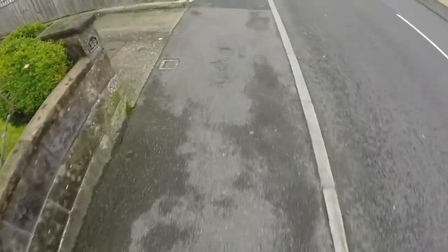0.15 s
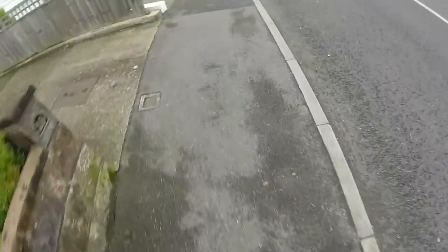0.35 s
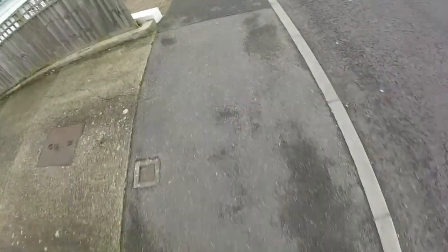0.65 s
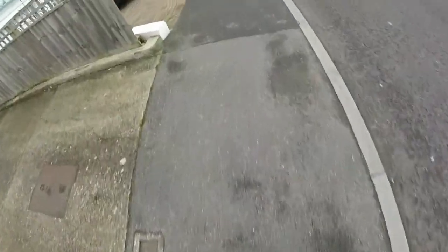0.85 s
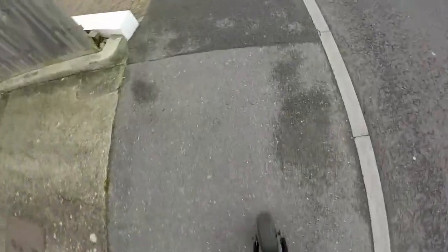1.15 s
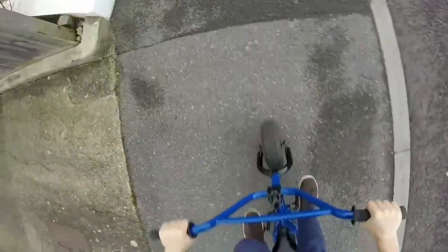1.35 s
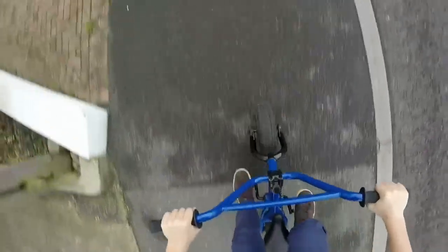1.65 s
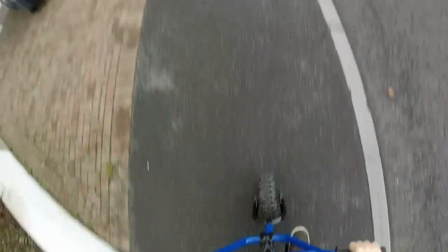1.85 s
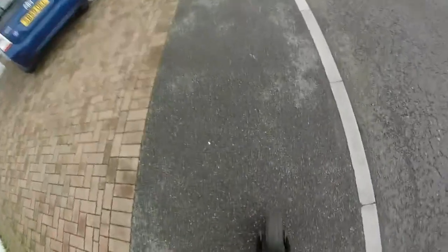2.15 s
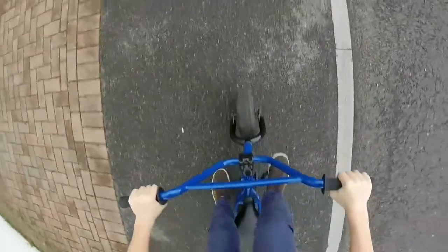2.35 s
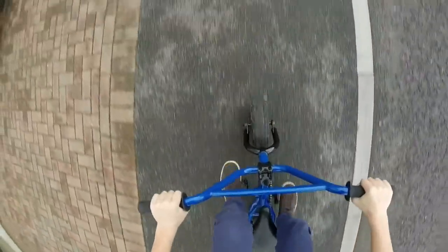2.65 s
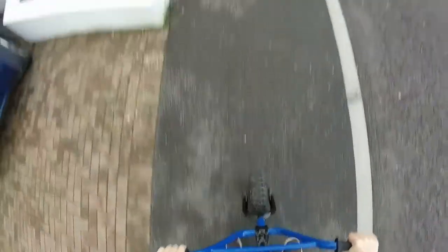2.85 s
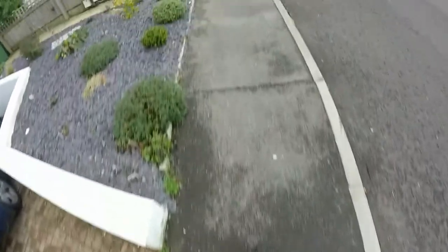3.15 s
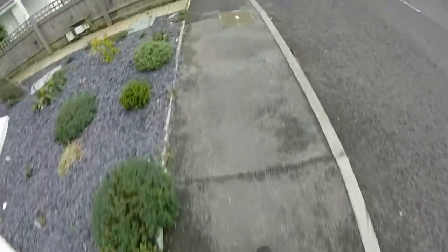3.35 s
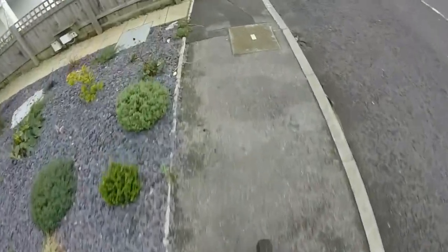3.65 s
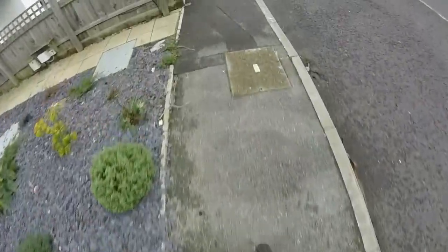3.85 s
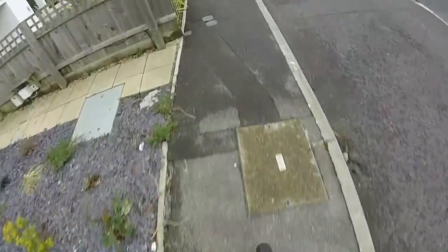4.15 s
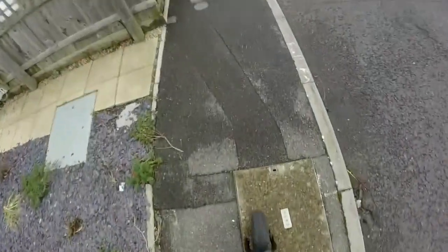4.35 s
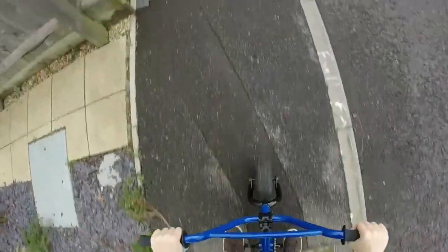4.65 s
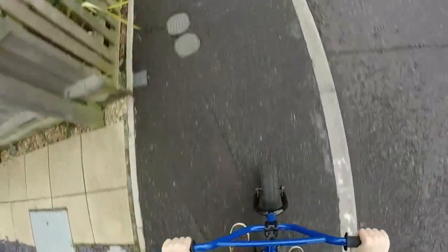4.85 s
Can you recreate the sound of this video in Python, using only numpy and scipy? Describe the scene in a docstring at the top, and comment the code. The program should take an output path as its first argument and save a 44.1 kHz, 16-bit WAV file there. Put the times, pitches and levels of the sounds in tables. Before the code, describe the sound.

Wind rumbles and bike tyres hiss over grit until bumps shake a loose camera mount into loud, hollow, quacking knocks.

```python
"""A plastic camera mount clacks on the rider of a small bike rolling along an asphalt pavement.
Near the end, bumps around a drain cover shake it into a quick run of quack-like knocks: it strikes its
stop, taps, and drops back hollowly, ringing the case. Underneath, heard from the worn camera, wind
rumbles on the case, the tyres hiss and crackle over grit, and the strap rubs in short rasps.
Shortly before the run of clacks a wheel starts to swish and whirr once a turn."""
import sys
import numpy as np
from scipy import signal
from scipy.fft import rfft, irfft
from scipy.io import wavfile
from scipy.ndimage import uniform_filter1d, minimum_filter1d

SR = 44100
rng = np.random.default_rng(int(sys.argv[2]) if len(sys.argv) > 2 else 0)


def pcm_store(signal):
    """Save signal as 16-bit PCM."""
    levels = np.round(np.clip(np.atleast_2d(signal), -1, 1) * 32767)
    wavfile.write(sys.argv[1], SR, levels.astype(np.int16).T)


N = 220588
T = np.arange(N) / SR


def gain_of(db):
    """Decibels to amplitude."""
    return 10 ** (np.asarray(db) / 20)


def unit_rms(x):
    """Scales to rms 1."""
    return x / np.sqrt(np.mean(x ** 2) + 1e-20)


def burst(x, db):
    """Scales a short sound so that its energy, spread over 10 ms, has this level."""
    return gain_of(db) * x / np.sqrt(np.sum(x ** 2) / (SR / 100) + 1e-20)


def add(mix, s, sound):
    """Mixes a sound in at time s."""
    part = mix[max(round(s * SR), 0):][:len(sound)]
    part += sound[:len(part)]


def swells(rows):
    """An envelope with one bell for each row of t/s, level/dB, half length/s."""
    return sum(gain_of(db) * np.exp(-.75 * ((T - s) / half_s) ** 2) for s, db, half_s in rows)


def stretch(start_s, end_s, edge_s):
    """An envelope that fades in, holds and fades out."""
    return (np.tanh((T - start_s) / edge_s) - np.tanh((T - end_s) / edge_s)) / 2


def coloured(x, tone):
    """Shapes x with an EQ curve of f/Hz, level/dB; the result has rms 1."""
    f, db = np.transpose(tone)
    hz = np.fft.rfftfreq(len(x), 1 / SR)
    eq = gain_of(np.interp(np.log(hz + 1), np.log(f + 1), db))
    return unit_rms(irfft(rfft(x) * eq, len(x)))


def wander(rate_hz):
    """Smooth random modulation, rms 1."""
    hz = np.fft.rfftfreq(N, 1 / SR)
    return unit_rms(irfft(rfft(rng.standard_normal(N)) * np.exp(-(hz / rate_hz) ** 2), N))


def noise_band(hz, width_hz):
    """Noise gathered round a centre that may move, rms 1."""
    carrier = np.exp(2j * np.pi * np.cumsum(hz * np.ones(N)) / SR)
    return unit_rms((carrier * (wander(width_hz) + 1j * wander(width_hz))).real)


def grains(per_s, spread_db):
    """Random clicks; with spread, a few stand out above the rest."""
    size = gain_of(spread_db * np.minimum(rng.exponential(1, N), 4))
    return size * rng.choice([-1, 1], N) * (rng.random(N) < per_s / SR)


def rumble(tone):
    """Low noise with its own surges levelled out, ready for an envelope."""
    noise = coloured(rng.standard_normal(N), tone)
    strength = np.sqrt(uniform_filter1d(abs(signal.hilbert(noise)) ** 2, size=4000))
    return unit_rms(noise / strength)


def wind():
    """Air buffets the case: a steady flow with gusts on top."""
    # steady airflow: t/s, level/dB
    breeze = [(0, -40), (1.2, -41), (2.1, -35), (3.3, -36), (3.8, -39), (5, -40)]
    # gusts: centre t/s, level/dB, half length/s
    gusts = [(1.04, -30.5, 0.04), (1.35, -33.5, 0.08), (1.63, -21.5, 0.032), (1.71, -32, 0.03),
             (1.8, -27.5, 0.028), (2.6, -22.5, 0.049), (4.93, -35, 0.13)]
    # EQ of the eddies: f/Hz, level/dB
    wind_tone = [(4, -15.5), (9, 9), (26, -2.5), (42, -14), (55, -41), (100, -51), (300, -52), (700, -89)]
    airflow = gain_of(np.interp(T, *np.transpose(breeze)))
    return (airflow + swells(gusts)) * rumble(wind_tone)


def frame(drone_db=-50, rise_s=0.024, fade_s=0.1):
    """The bike's frame drones and booms at each bump."""
    # bumps in the pavement: t/s, level/dB
    bumps = [(0.539, -36.5), (1.62, -37.5), (1.7, -41.5), (1.78, -41), (2.04, -39.5), (2.25, -39.5),
             (2.541, -31), (3.1, -39.5), (3.5, -42), (3.8, -51.5), (4.06, -30.5), (4.23, -32),
             (4.46, -35.5), (4.6, -29)]
    # EQ of the frame's drone: f/Hz, level/dB
    drone_tone = [(25, -3.5), (44, -0.5), (53, 5.5), (64, -12), (80, -13), (120, -30.5), (300, -37),
                  (700, -78)]
    booms = sum(gain_of(db) * np.exp(-np.maximum((s - T) / rise_s, (T - s) / fade_s)) for s, db in bumps)
    return np.hypot(gain_of(drone_db), booms) * rumble(drone_tone)


def tyres(road_db=-55.5, flutter_db=0.9, grit_db=-77, sand_db=-83):
    """A steady rolling wash, grit that crackles louder on rough stretches, and a fine fizz of sand."""
    # EQ of rubber rolling on asphalt: f/Hz, level/dB
    road_tone = [(40, -7), (100, 1.5), (170, 1.5), (300, -4.5), (600, -7.5), (1000, -10.5), (1800, -10),
                 (2700, -13), (3400, -17.5), (4500, -19.5), (6000, -23.5), (8000, -28.5), (11000, -33.5),
                 (15000, -42)]
    # gritty stretches: start t/s, end t/s, level/dB
    patches = [(.7, 1.55, -76.5), (1.56, 2.173, -65), (2.524, 3.162, -67), (3.15, 3.75, -75)]
    # EQ of the grit: f/Hz, level/dB
    grit_tone = [(500, -7), (1500, -25), (2750, 8.5), (3400, -5), (4400, 4), (6000, -7.5), (7500, -18),
                 (9000, -12.5), (11000, -35), (14000, -50)]
    # EQ of the sand: f/Hz, level/dB
    sand_tone = [(3000, -23), (6000, 1), (8800, -19), (12000, -5), (15000, -20)]
    wash_gain = gain_of(road_db + flutter_db * wander(rate_hz=37))
    wash = wash_gain * coloured(rng.standard_normal(N), road_tone)
    roughness = sum(gain_of(db) * stretch(start, end, edge_s=0.051) for start, end, db in patches)
    grit = (gain_of(grit_db) + roughness) * coloured(grains(per_s=520, spread_db=2.0), grit_tone)
    sand = gain_of(sand_db) * coloured(grains(per_s=260, spread_db=1.5), sand_tone)
    return wash + grit + sand


def stones(chink_hz=8750, chink_t60=0.012, detune=.03):
    """Flicked stones ping the metal of the wheel; the smallest only chink."""
    # modes of the rim: f/Hz, level/dB, t60/s
    rim_modes = [(2770, 2.5, 0.038), (3945, 3.5, 0.018), (4460, 3.5, 0.02), (5240, -5, 0.015),
                 (5960, -11, 0.018)]
    # stones hitting the wheel: t/s, level/dB
    hits = [(0.593, -61), (1.267, -62.5), (1.735, -57), (1.781, -52), (2.029, -54), (2.718, -65)]
    # chinks of fine grit: t/s, level/dB
    chinks = [(3.007, -78), (3.029, -73), (3.069, -79), (3.093, -73), (3.631, -71)]
    out, t = np.zeros(N), np.arange(SR // 12) / SR
    ping = sum(gain_of(db - 60 * t / t60) * np.sin(2 * np.pi * hz * t) for hz, db, t60 in rim_modes)
    for s, db in hits:
        add(out, s, burst(ping, db))
    for s, db in chinks:
        hz = chink_hz * (1 + detune * rng.uniform(-1, 1))
        add(out, s, burst(gain_of(-60 * t / chink_t60) * np.sin(2 * np.pi * hz * t), db))
    return out


def wheel_swish(start_s=3.326, end_s=4.857, start_db=-56, growth_db_per_s=5, flutter_db=2.0):
    """The wheel's dry swish sets in, grows with a flutter and dies away."""
    # EQ of the swish: f/Hz, level/dB
    swish_tone = [(100, 4), (400, -2), (1000, -12), (1500, -2.5), (2000, 2.5), (2650, -5.5), (3200, -14),
                  (5000, -28.5), (10000, -54)]
    swish = stretch(start_s, end_s, edge_s=0.069) * coloured(rng.standard_normal(N), swish_tone)
    return swish * gain_of(start_db + growth_db_per_s * (T - start_s) + flutter_db * wander(rate_hz=23))


def wheel_whirr(db=-54, first_s=3.79, turn_s=0.42, turns=3, half_s=0.089, low_hz=2490, top_hz=2660):
    """The wheel whirrs once a turn, its pitch and level rising and falling with the pressure."""
    pressure = sum(np.exp(-((T - first_s - turn * turn_s) / half_s) ** 2 / 2) for turn in range(turns))
    hz = low_hz + (top_hz - low_hz) * pressure
    return gain_of(db) * pressure * noise_band(hz, width_hz=290)


def wheel_sizzle():
    """A thin, high rolling sizzle comes and goes."""
    # spells of sizzle: centre t/s, level/dB, half length/s
    spells = [(.345, -62, 0.0069), (1.0, -78, 0.39), (4.2, -74, 0.2), (4.72, -69, .03)]
    return swells(spells) * noise_band(hz=5800, width_hz=230)


def rasps(rows, tone):
    """Friction: each rasp is a swell of tiny slips."""
    return swells(rows) * coloured(grains(per_s=2500, spread_db=0.0), tone)


def strap():
    """Dull rubs of the strap come through the case."""
    # rubs: centre t/s, level/dB, half length/s
    rubs = [(.2, -53.5, 0.0077), (0.3, -62, 0.048), (0.363, -61, 0.0096), (.72, -56.5, 0.016),
            (0.823, -54, 0.023), (.995, -52, 0.0087), (1.326, -53, 0.015), (1.569, -44, 0.023),
            (2.116, -44, 0.021), (2.224, -47, 0.02), (2.317, -49.5, 0.024), (2.49, -55.5, 0.053),
            (2.59, -43, 0.018), (2.629, -46, 0.014), (2.736, -57, 0.053), (3.26, -54, 0.019),
            (3.85, -51, 0.023)]
    # EQ of a rub: f/Hz, level/dB
    rub_tone = [(300, -12), (600, -8.5), (950, -16), (1400, 4), (1750, 7), (2300, 1), (3000, -11.5),
                (5000, -26), (10000, -43)]
    return rasps(rubs, rub_tone)


def tyre_scuffs():
    """The tyres give a few short, bright scuffs."""
    # scuffs: centre t/s, level/dB, half length/s
    scuffs = [(2.586, -56.5, .011), (2.722, -61, .007), (2.12, -68, .025), (3.05, -69, .03)]
    # EQ of a scuff: f/Hz, level/dB
    scuff_tone = [(1500, -1), (3000, -16), (5000, 8), (7000, 1), (9000, -10), (11000, -16), (14000, -29)]
    return rasps(scuffs, scuff_tone)


def bounce(db, thump_hz=165, sag_hz=80, t60=0.053, detune=0.2):
    """The camera thumps on its strap, at a different pitch each time."""
    t = np.arange(SR // 7) / SR
    pitch = 1 + detune * rng.uniform(-1.32, 1)
    thump = sum(np.sin(2 * np.pi * hz * pitch * t) for hz in (thump_hz, sag_hz))
    return burst(thump * gain_of(-60 * t / t60), db)


def bolt(db, hz=2215, t60=0.085):
    """The thin ring that the metal bolt keeps up after a hard blow."""
    t = np.arange(SR // 7) / SR
    return burst(np.sin(2 * np.pi * hz * t) * gain_of(-60 * t / t60), db)


def snap(db, rise_s=0.00073):
    """The crisp instant in which plastic skids over plastic."""
    # EQ of the skid: f/Hz, level/dB
    snap_tone = [(3000, -26), (6000, -8), (7400, 9.5), (8400, -1), (9600, 8.5), (11000, -12), (12500, -5),
                 (13700, -14), (15000, -21)]
    t = np.arange(SR // 50) / SR
    return burst(coloured(rng.standard_normal(len(t)), snap_tone) * t * np.exp(-t / rise_s), db)


def ring(force, hz, t60, rise_s=0.00017, band_ratio=1.186):
    """A force drives one mode of the case: fast attack, decaying tail, band-passed for steep flanks."""
    t = np.arange(len(force)) / SR
    mode = (1 - np.exp(-t / rise_s)) * gain_of(-60 * t / t60) * np.sin(2 * np.pi * hz * t)
    flanks = signal.butter(2, (hz / band_ratio, hz * band_ratio), "band", fs=SR, output="sos")
    return signal.sosfilt(flanks, signal.fftconvolve(force, mode)[:len(t)])


def knock(place, db, depth_db, bright_db, edge_db, semitones, chatter_s,
          chatter=0.12, rattle=0.053, rattle_s=0.0043, rattle_hz=3200, detune=0.0077):
    """A blow, its chatter and a duller after-rattle ring the case; the place decides which modes speak."""
    # modes of the plastic case: f/Hz, t60/s, level/dB at the stop, when tapped, at the seat
    case_modes = [(238.3, 0.096, -24.5, -14, -16.5), (456, 0.037, -16, -18, -6.5),
                  (528.7, 0.02, -16, -7, 1.5), (679.5, 0.039, -11, -8.5, -8), (977, 0.024, -5, -13.5, -11),
                  (1201, 0.014, -33, -7.5, -0.5), (1481, 0.0052, 2, 4, 3.5), (1684, 0.007, 3.5, -1, 2),
                  (1922, 0.0058, -4.5, -5, -2), (2227, 0.01, -6.5, 1.5, 1.5), (2495, 0.0055, 2, -2, -21),
                  (2750, 0.009, -6.5, -15, -8), (3080, 0.0062, -19, -15, -10), (3570, 0.013, -3.5, -6, 0),
                  (4640, 0.009, -5, -2, 0.5), (5400, 0.012, -13, -13, -10.5), (5970, 0.0061, -11, -14, -24),
                  (6690, 0.0062, -11.5, -30, -22)]
    # crossovers between the deep, middle, bright and edge modes: f/Hz
    crossovers = [1000, 1300, 1800, 2200, 3000, 3400]
    t = np.arange(SR // 7) / SR
    lowpass = signal.butter(2, rattle_hz, fs=SR, output="sos")
    force = chatter * t / chatter_s * np.exp(1 - t / chatter_s) * rng.standard_normal(len(t))
    force += rattle * np.exp(-t / rattle_s) * signal.sosfilt(lowpass, rng.standard_normal(len(t)))
    force[0] += 1  # the first contact
    out = np.zeros(len(t))
    for hz, t60, stop_db, tap_db, seat_db in case_modes:
        place_db = {"stop": stop_db, "tap": tap_db, "seat": seat_db}[place]
        colour_db = np.interp(hz, crossovers, [depth_db, 0, 0, bright_db, bright_db, edge_db])
        shift = semitones * np.interp(hz, crossovers, [0, 1, 1, 1, 1, 0])  # middle and bright modes only
        tuned_hz = hz * 2 ** (shift / 12) * (1 + detune * rng.uniform(-0.57, 1))
        out += burst(ring(force, tuned_hz, t60), db + place_db + colour_db)
    return out


def mount(bounce_lag_s=0.0029, landing_bounce_db=-2.5):
    """The loose mount strikes, taps, lands and ticks; strikes and landings bounce the camera."""
    # hard throws against the stop: t/s, level/dB, depth/dB, brightness/dB, edge/dB, pitch/semitones,
    # chatter/s, bounce/dB, bolt/dB, snap/dB, snap delay/s
    strikes = [(4.062, -17.5, -5.5, -5.5, -14, .3, 0.0009, -29, -35.5, -56, .0027),
               (4.2122, -14.5, -6.5, -2, -13.5, 0.48, 0.00086, -35.5, -48, -57.5, .003),
               (4.3542, -25.5, -3.5, 1, -6.5, 0.26, 0.0005, -30, -65, -56, .0002),
               (4.6286, -22, 0.5, 10.5, -3.5, 0.2, 0.00051, -24.5, -39, -50, .0006),
               (4.7524, -25.5, -4, 8, -3.5, .5, 0.0009, -30, -33, -52.5, .0013)]
    # light touches: t/s, level/dB, depth/dB, brightness/dB, edge/dB, pitch/semitones
    taps = [(0.255, -59.5, -12, 0, -7, 1), (0.5284, -37.5, -20, -0.5, -31, 1.12),
            (1.315, -56.5, -2, -1, -18, -0.095), (2.575, -50.5, -3, -3, -21, 0.25),
            (4.044, -37.5, -3, 3, -7.5, 0.59), (4.1208, -28, -11, -12, -27, -0.93),
            (4.325, -34, 2.5, -15, -27, -0.82), (4.3507, -35.5, -5, 9.5, -17, -0.32),
            (4.4293, -31.5, -3.5, -6, -28, -0.77), (4.5121, -31, -10.5, -2, -35, 0.18),
            (4.5428, -36.5, 5.5, -8, -19, -0.88), (4.6252, -26, -3, -5, -23, 0.84),
            (4.6465, -45, -3, 1, -22, 0.0014), (4.6504, -27, -5.5, -5.5, -27, -1.3),
            (4.7473, -34, 2, 7, -16, -0.14)]
    # hollow drops back onto the seat: columns as for taps
    landings = [(0.529, -53, 9, -14, -28, .2), (4.1272, -28.5, -1.5, -1, -18.5, -0.34),
                (4.2346, -38.5, 2, -3, -23, .2), (4.241, -25, -3.5, -2, -14, 0.28),
                (4.2506, -44, -2, -6, -22, -.5), (4.3349, -30.8, 0.5, -1.5, -22, -.3),
                (4.4371, -38.5, 4, -3, -25, -0.25), (4.553, -29, -1.5, -0.5, -19.5, .3),
                (4.662, -37, 4, 1, -16.5, .2), (4.871, -54, 4.5, -17, -17, -0.56)]
    # thin ticks of the loose joint: columns as for taps
    ticks = [(4.009, -52.5, -6, 8, 5, .3), (4.965, -58, -6, 4, 4.5, 1.2), (4.9738, -61.5, 0, 9.5, 0, 2.9)]
    out = np.zeros(N)
    for s, *blow, bounce_db, bolt_db, snap_db, snap_lag_s in strikes:
        add(out, s, knock("stop", *blow) + bolt(bolt_db))
        add(out, s + snap_lag_s, snap(snap_db))
        add(out, s + bounce_lag_s, bounce(bounce_db))
    for s, *blow in taps:
        add(out, s, knock("tap", *blow, chatter_s=0.00064, rattle=0.0084))
    for s, db, depth_db, *colour in landings:
        add(out, s, knock("seat", db, depth_db, *colour, chatter_s=0.00031))
        add(out, s + bounce_lag_s, bounce(db + depth_db + landing_bounce_db))
    for s, *blow in ticks:
        add(out, s, knock("stop", *blow, chatter_s=0.00039))
    return out


def scene():
    """The mount over the bed of the ride, all close, dry and mono."""
    bed = wind() + frame() + tyres() + stones()
    wheel = wheel_swish() + wheel_whirr() + wheel_sizzle()
    return (bed + wheel + strap() + tyre_scuffs() + mount())[None]


def record(dry, ceiling=.93, cutoff_hz=15100):
    """A fast limiter holds the loudest clacks under full scale; a steep low-pass trims the top."""
    safe_gain = np.minimum(1, ceiling / (abs(dry) + 1e-9))
    limited = dry * uniform_filter1d(minimum_filter1d(safe_gain, size=129), size=129)
    lowpass = signal.firwin(511, cutoff_hz, window=("kaiser", 9), fs=SR)
    return signal.oaconvolve(limited, lowpass[None], "same")


dry = scene()
out = record(dry)
pcm_store(out)
```